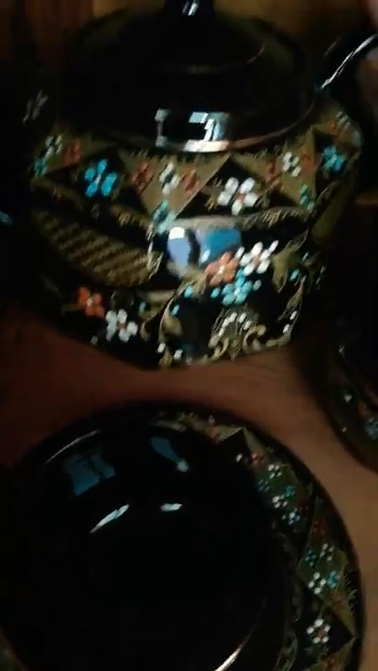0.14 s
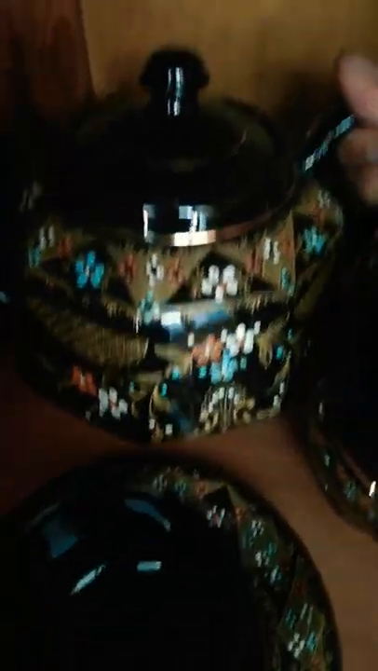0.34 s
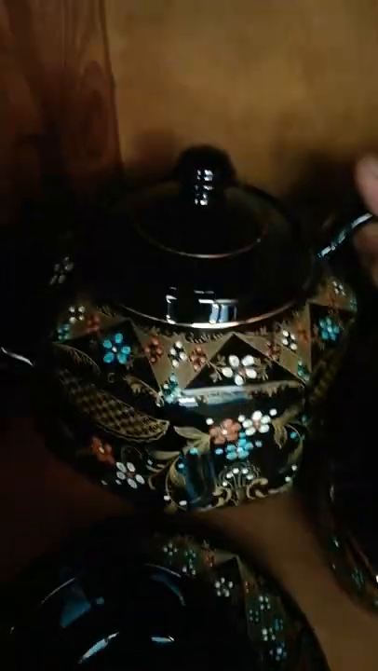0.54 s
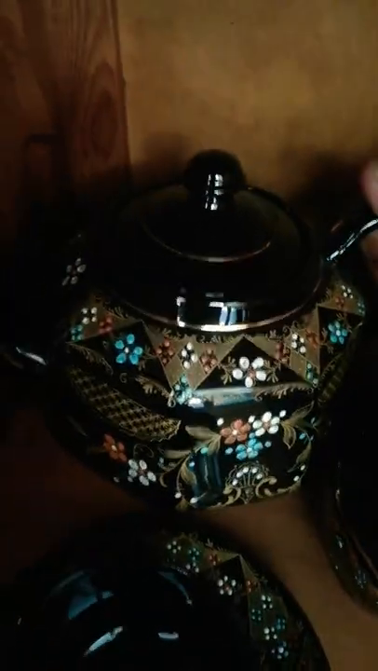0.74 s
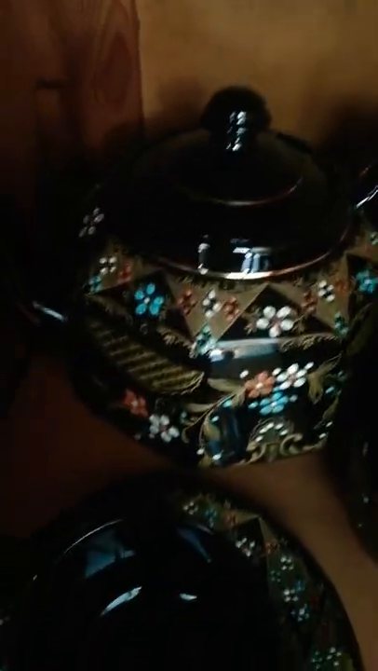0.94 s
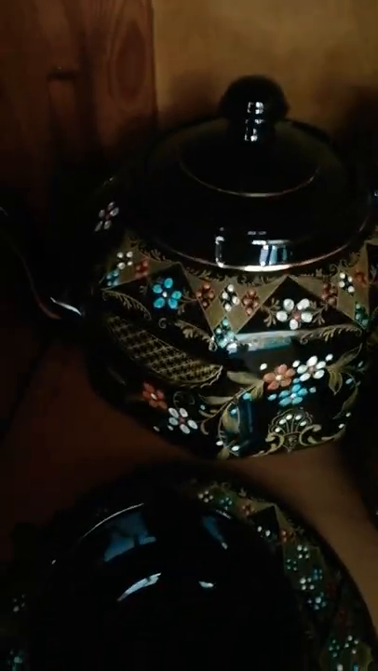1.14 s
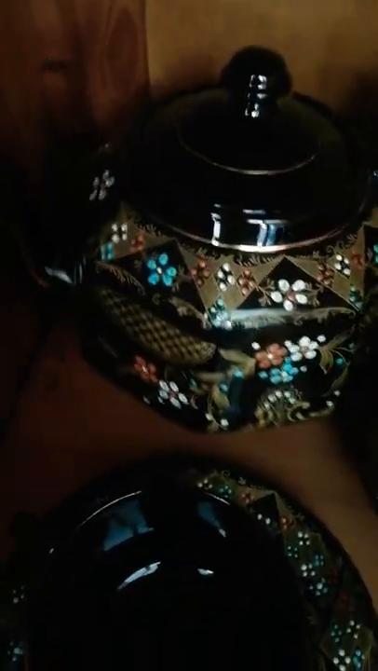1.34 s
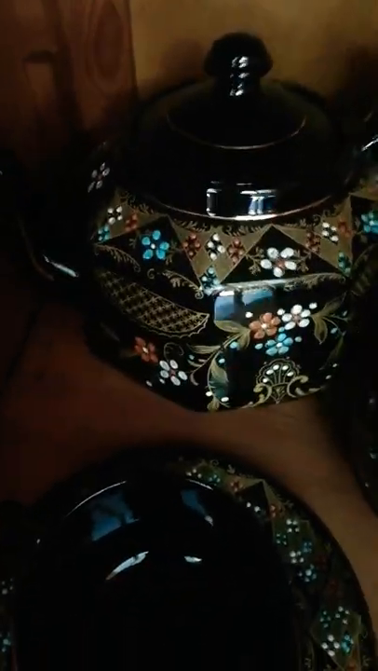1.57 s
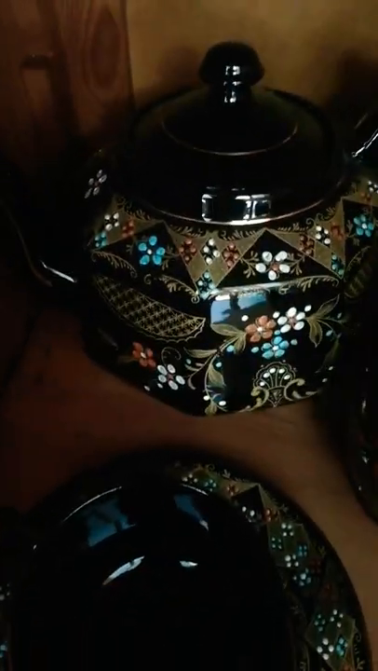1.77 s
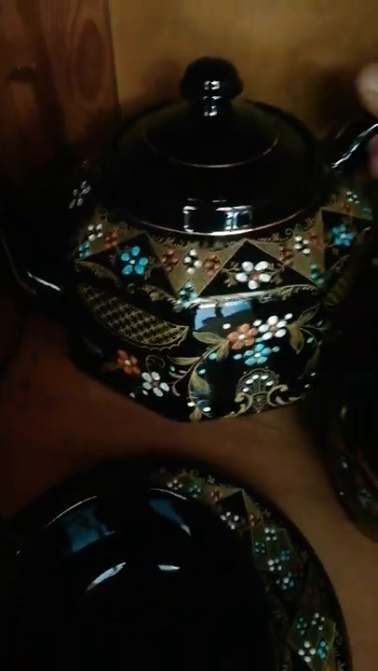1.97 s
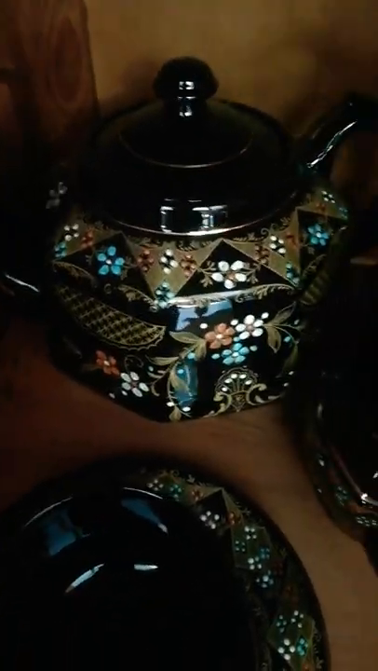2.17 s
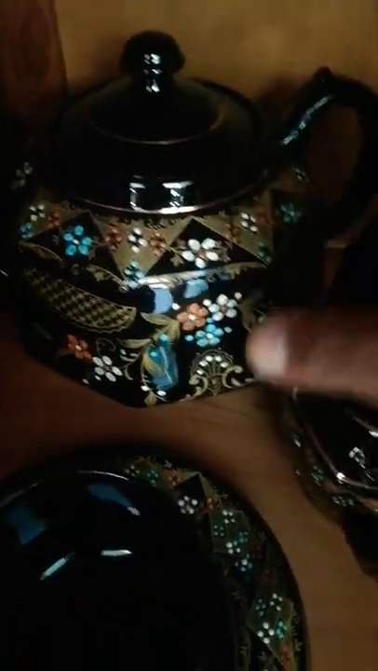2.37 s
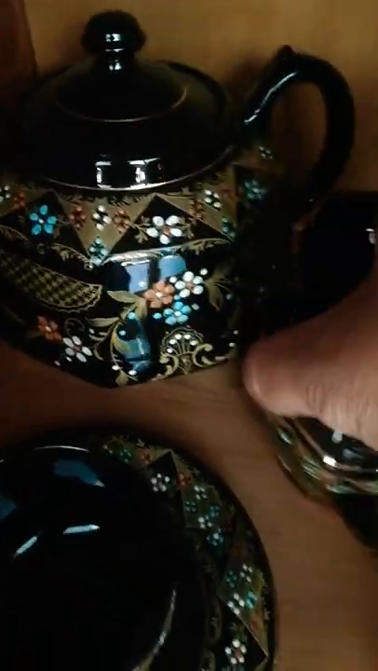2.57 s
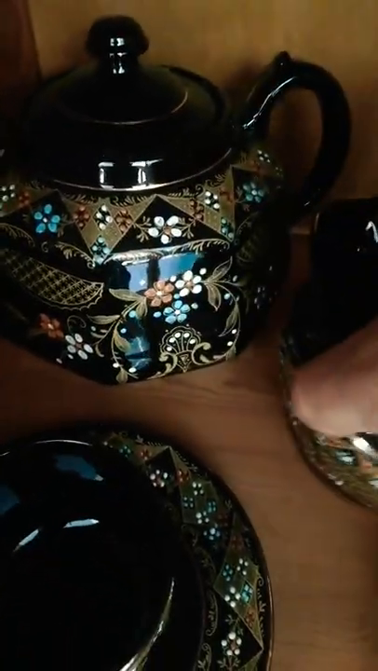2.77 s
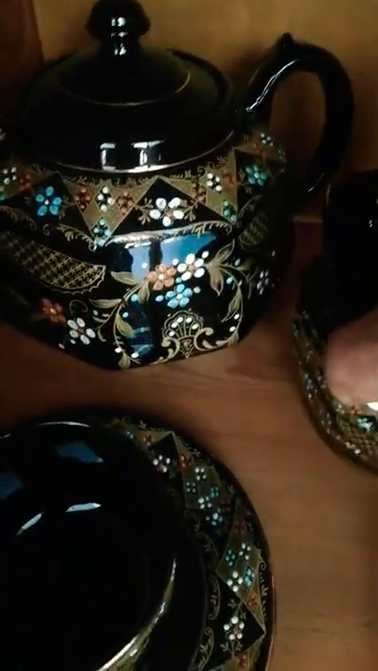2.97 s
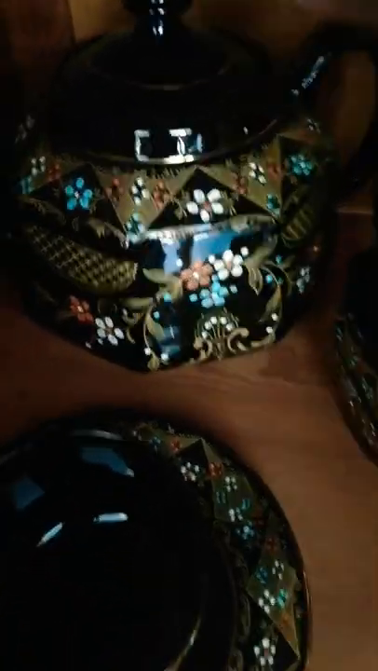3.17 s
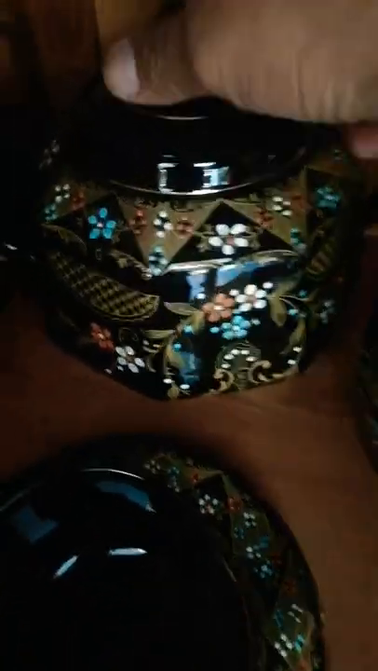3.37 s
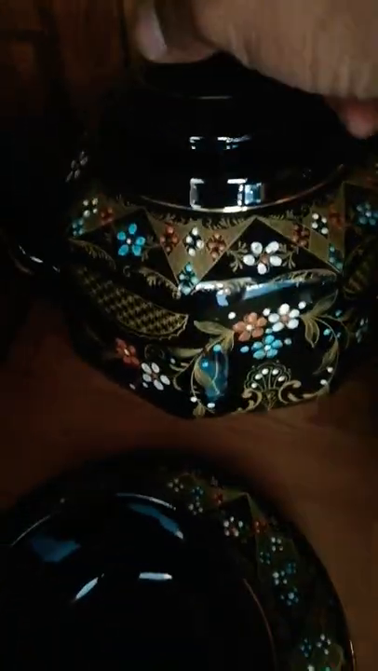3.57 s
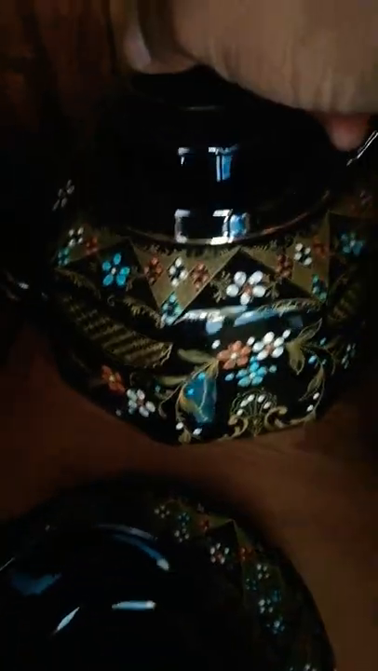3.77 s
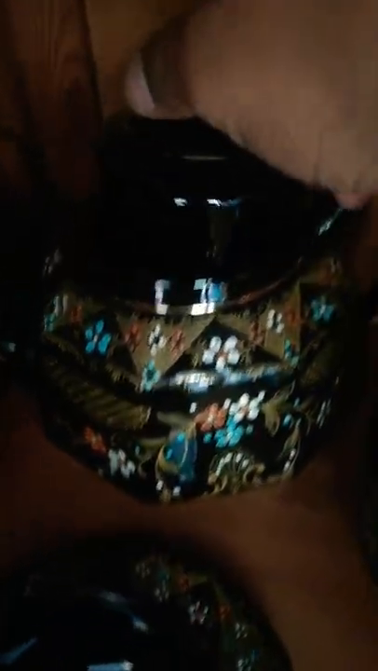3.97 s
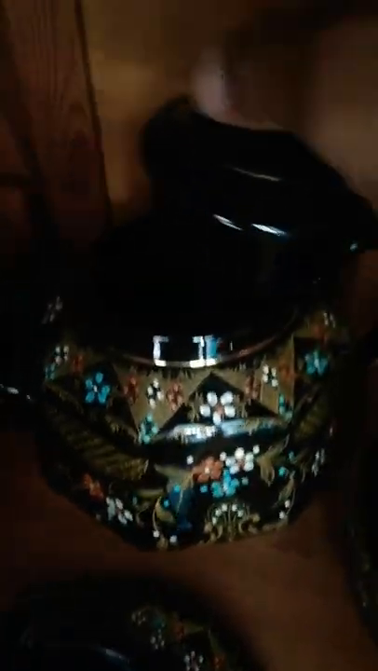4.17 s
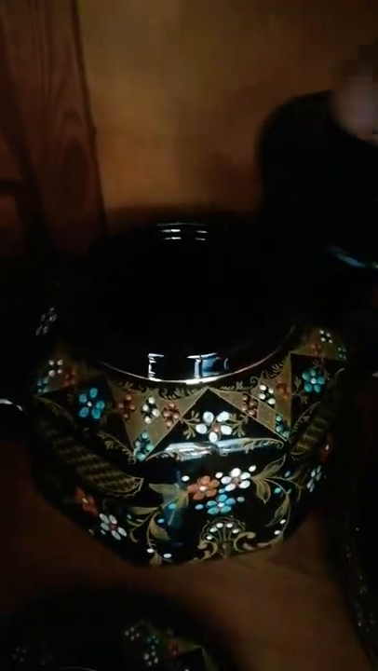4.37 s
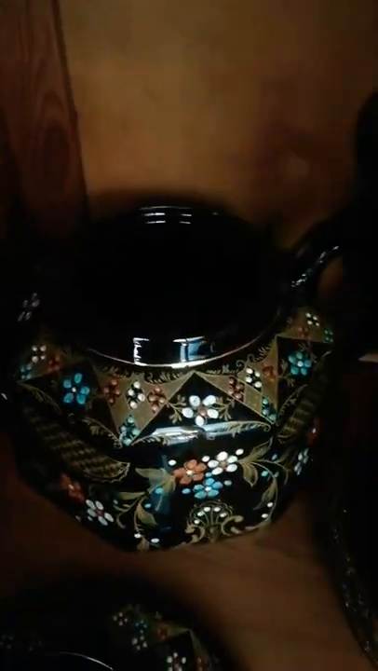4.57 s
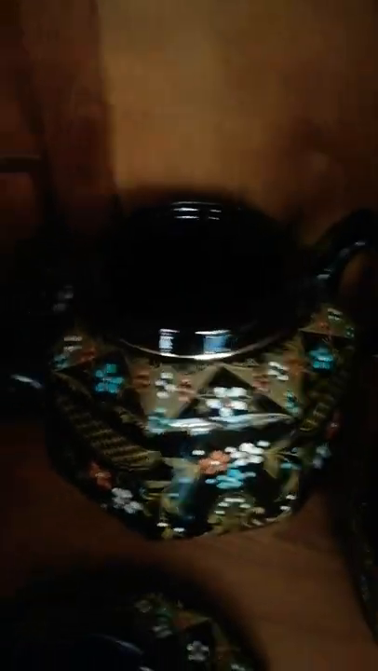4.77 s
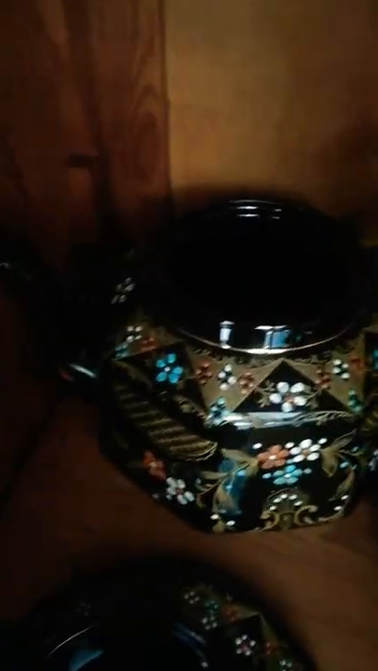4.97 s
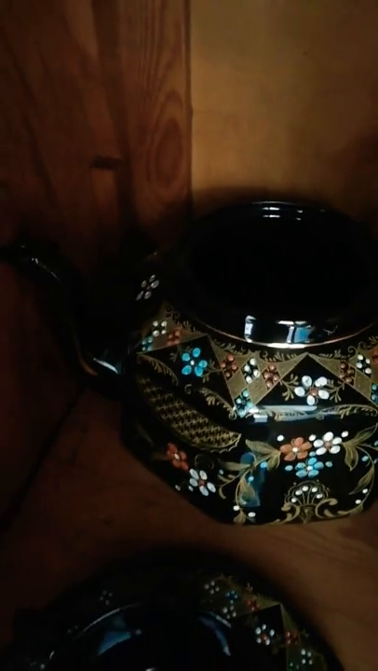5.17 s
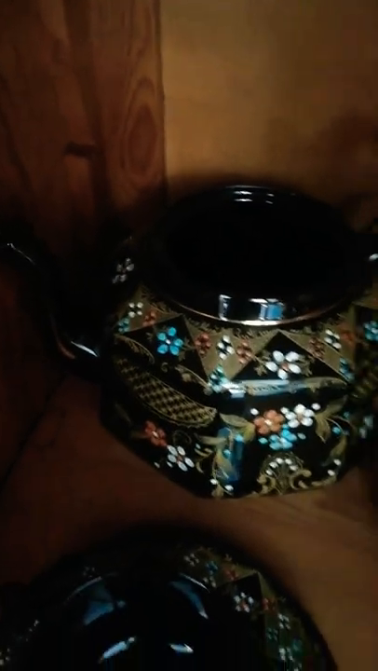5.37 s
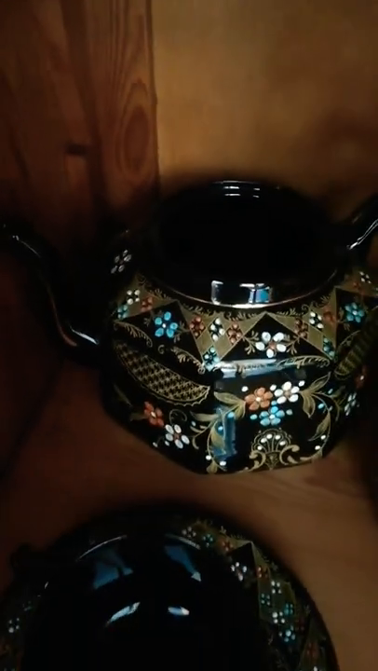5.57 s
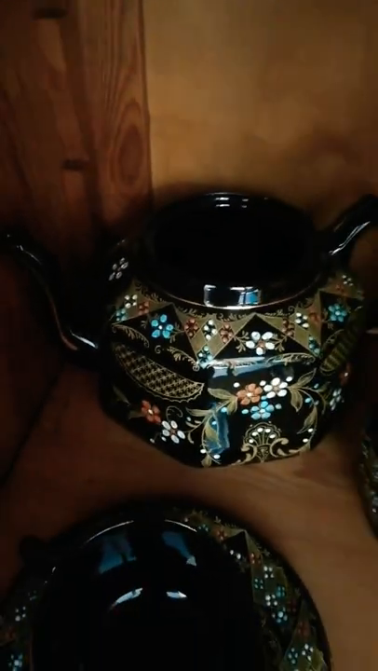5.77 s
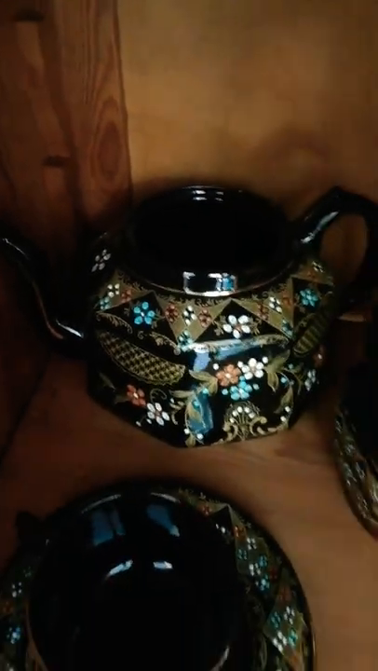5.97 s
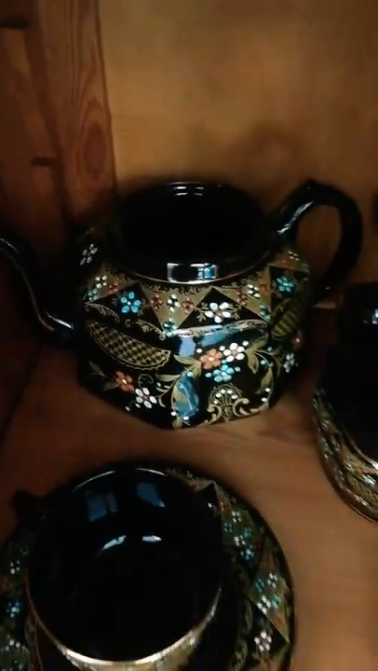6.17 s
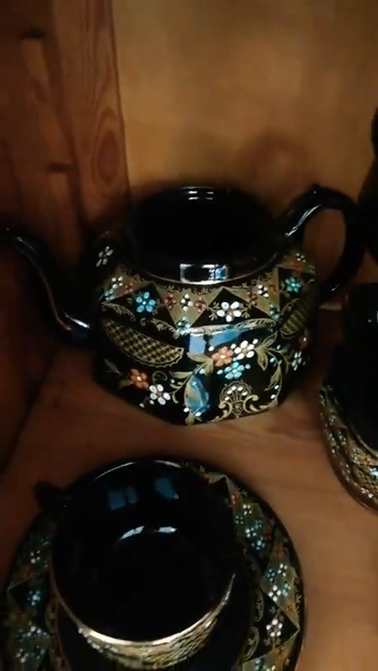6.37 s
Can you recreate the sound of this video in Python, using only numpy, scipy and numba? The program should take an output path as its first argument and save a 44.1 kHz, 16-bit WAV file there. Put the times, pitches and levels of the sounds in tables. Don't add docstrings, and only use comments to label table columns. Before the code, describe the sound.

China pieces are handled on a wooden shelf, heard from a hand-held phone very near. Low rumbles, dull knocks and gritty rasps lead to a hard teapot landing, by far the fullest hit. After a near pause, a jug is pushed aside with a clear clink; light finger taps follow, then a fast bright burst of lid clatter and a short ringing tail into faint hiss.

```python
import sys
import numpy as np
from scipy import signal
from scipy.fft import rfft, irfft, next_fast_len
from scipy.io import wavfile
from scipy.ndimage import uniform_filter1d, map_coordinates
from numba import njit

SR = 44100
rng = np.random.default_rng(int(sys.argv[2]) if len(sys.argv) > 2 else 0)


def bounce(signal):
    frames = np.transpose(np.atleast_2d(signal))
    limited = np.clip(frames, -1, 1)
    pcm = np.round(limited * 32767).astype(np.int16)
    wavfile.write(sys.argv[1], SR, pcm)


def invert_db(x):
    u = np.asarray(x, float) / 20
    return 10 ** u


N = 283563


def unit(x):
    return x / np.sqrt(np.mean(x ** 2))


def tint(x, points):
    hz, db = np.transpose(points)
    size = next_fast_len(x.shape[-1])
    log_hz = np.log(np.arange(size // 2 + 1) * SR / size + 1)
    gain = invert_db(np.interp(log_hz, np.log(hz), db))
    return irfft(rfft(x, size) * gain, size)[..., :x.shape[-1]]


def band(x, lo_hz, hi_hz):
    return signal.sosfilt(signal.butter(3, [lo_hz, hi_hz], "band", fs=SR, output="sos"), x)


def pair(apart_hz):
    mid, side = rng.standard_normal((2, N))
    side = tint(side, [(apart_hz / 10, -20), (apart_hz, 0)])
    return mid + side * np.array([[1], [-1]])


def drift(x, seconds):
    span = int(seconds * SR)
    slow = uniform_filter1d(uniform_filter1d(x, span), span)
    return unit(slow - slow.mean())


def grit(shape, scatter_db):
    return unit(rng.standard_normal(shape) * invert_db(scatter_db * rng.exponential(size=shape)))


@njit
def resonate(x, free, pole, left, right):
    out = np.zeros((2, len(x)))
    for m in range(len(pole)):
        z = 0j
        for i in range(len(x)):
            z = z * pole[m] * free[i] + x[i]
            out[0, i] += (left[m] * z).imag
            out[1, i] += (right[m] * z).imag
    return out


def ring(x, modes, lag_s=0.00047, touch=0.):
    hz, t60, db, pan_db = np.transpose(modes)
    pole = np.exp((2j * np.pi * hz - np.log(1000) / t60) / SR)
    start, turn = rng.uniform(0, 2 * np.pi, (2, len(hz)))
    turn = np.sin(turn) * np.minimum(2 * np.pi * hz * lag_s, np.pi)
    left = invert_db(db + pan_db / 2) * np.exp(1j * (start + turn))
    right = invert_db(db - pan_db / 2) * np.exp(1j * start)
    free = invert_db(-touch * np.ones(N) / SR)
    return resonate(x + 1e-18, free, pole, left, right)


def pushes(table):
    push = np.zeros(N)
    for s, db in table:
        push[int(s * SR)] = invert_db(db)
    return push


def strike(table, modes, touch=0.):
    return ring(pushes(table), modes, touch=touch)


def touching(table, db_per_s):
    t = np.arange(N) / SR
    contact = sum((t > row[0]) & (t < row[0] + row[-1]) for row in table)
    return db_per_s * np.clip(contact, 0, 1)


def heavy(table):
    s, ring_db, knock_db, thump_db, length = np.transpose(table)
    return np.c_[s, ring_db, knock_db, thump_db, thump_db - 14.5, length]


def light(table, passes):
    return np.array([(s, db, *passes, length) for s, db, length in table])


def blows(table, chatter_db, first_db, rise):
    drive, t = np.zeros((4, N)), np.arange(SR // 8) / SR
    for (s, *layer_db, length), bits in zip(table, grit((len(table), len(t)), 2.1)):
        part = t / length
        push = invert_db(chatter_db) * bits * np.minimum(part / rise, 1) / (1 + part ** 8)
        push[0] = invert_db(first_db)
        at = int(s * SR)
        drive[:, at:at + len(t)] += invert_db(np.array(layer_db))[:, None] * push
    return drive


# (frequency [Hz], level per Hz [dB])
CRACK = [(180, -28.5), (300, -8.5), (543, -4.5), (936, -6), (1810, -14), (2280, -18.5), (3120, -20.5),
         (6450, -21.5), (7000, -30.5), (8670, -22.5), (14600, -36.5), (15300, -60.5)]


def crack(x, t60):
    t = np.arange(SR // 5) / SR
    burst = unit(tint(rng.standard_normal((2, len(t))), CRACK)) * invert_db(-60 * t / t60)
    return signal.fftconvolve(x[None], burst, axes=1)[:, :N]


def china(table, modes, notes_db, crack_db, crack_t60, chatter_db, hard_hz, touch=0., first_db=0.95, rise=.02):
    drive = blows(table, chatter_db, first_db, rise)
    keep = np.exp(-2 * np.pi * hard_hz / SR)
    contact = signal.lfilter([1 - keep], [1, -keep], drive[0])
    notes = invert_db(notes_db) * ring(contact, modes, touch=touch)
    return notes + invert_db(crack_db) * crack(contact, crack_t60), drive[1:]


# (time [s], ring [dB], hollow knock [dB],
# board thump [dB], chatter length [s])
POT_BLOWS = [
    (1.047, -44, -33.5, -28.5, 0.014),
    (1.4686, -39.5, -46, -36, 0.04),
    (1.677, -4.5, -7.5, -5, 0.021),
    (1.7863, -23, -21.5, -25.5, 0.0061),
    (3.4387, -22.5, -30.5, -39.5, 0.018),
    (3.4665, -27.5, -41, -43, 0.017),
    (3.5011, -20.5, -33, -46.5, 0.0076),
             (1.6832, -4.5, -10, -13, .05),
]
# (frequency [Hz], t60 [s], level [dB], left minus right [dB])
POT = [(1530, 0.26, -13, 0), (1286, 0.068, -8.5, -1.5), (2486, 0.071, -11, -5.5),
       (2816, 0.046, -13.5, -0.5), (3220, 0.19, -26, -2.5), (3790, 0.093, -15.5, -1.5),
       (4530, 0.12, -12, -4), (5940, 0.05, -18, 1), (6486, 0.07, -20.5, 0), (9010, 0.08, -9.5, -4),
       (9330, 0.13, -15.5, -1), (10320, .1, -4.5, 0), (10512, 0.087, -10.5, -0.5), (12660, 0.042, -17, -7),
       (13000, .08, -17, 5)]


def teapot():
    return china(heavy(POT_BLOWS), POT, -13.5, -2.0, 0.023, -24.0, 8700, first_db=-5.5, rise=0.11)


# (time [s], ring [dB], chatter length [s])
LID_TILTS = [(3.5005, -24, 0.017), (3.6115, -11, .009), (3.6405, -13, .011), (3.689, -22.5, 0.00982),
             (3.7215, -24, 0.011)]
LID_LIFTS = [(3.8850, -2, 0.01), (3.8967, -9.5, .008), (3.9105, -2.5, 0.0059), (3.9233, -9, 0.012),
             (3.939, -5, .010), (3.9643, -14.5, 0.0022)]
CHOKE_S, CHOKE_DB_PER_S = 0.0015, 3498.5


def choke():
    closing = [(row[0] - CHOKE_S, CHOKE_S) for row in LID_TILTS[2:] + LID_LIFTS[1:]]
    return touching(closing, CHOKE_DB_PER_S)


# (time [s], length [s])
GRIP = [(4.25, 1)]


def held():
    return touching(LID_TILTS + LID_LIFTS, 270) + choke() + touching(GRIP, 70)


LID_HZ = [1555, 2016, 2730, 2690, 3200, 3370, 3537, 3712, 3736, 3920, 4243, 4269, 5480, 5722, 6016, 6490,
          6665, 7232, 7483, 8312, 8568, 8600, 9130, 9541, 9749, 10104, 10385, 11480, 12600, 14240]
# (t60 [s], level tilted [dB], level lifted [dB], left minus right [dB])
LID = [(0.18, -22.5, -21, -2.5), (1, -11.5, -24.5, -6), (0.49, -15.5, -19.5, 5), (0.3, -18, -27.5, -1),
       (0.31, -14, -24.5, 7), (0.38, -19.5, -16.5, -1), (0.2, -16.5, -28, 2), (0.41, -5, -11, 1.5),
       (0.36, -17, -19, 2), (0.25, -23.5, -19, 1), (0.15, -24.5, -20, 1), (0.29, -14, -18.5, 5),
       (.2, -23.5, -27.5, -3.5), (0.173, -23, -14.5, 4.5), (0.099, -18, -16.5, 3), (0.2, -10.5, -13, 6.5),
       (0.24, -11.5, -19.5, -2), (0.036, -12.5, -19.5, -2), (0.15, -13.5, -26.5, 0.5),
       (0.05, -9.5, -13.5, -3.5), (0.086, -17.5, -4, -5), (0.19, -18.5, -13.5, -3.5),
       (0.041, -15.5, -14.5, -5), (0.11, -22.5, -18, -5), (0.14, -14, -15, -3), (0.049, -15, -3.5, -6),
       (0.044, -15, -8, -1), (0.05, -15, -25, -6), (0.0067, -20, -20.5, -4), (.08, -19, -17, 0)]
# (hollow knock [dB], board thump [dB], deep thump [dB])
TILT_PASSES = (-32.5, -34, -41)


def tilted_lid():
    modes = np.c_[LID_HZ, LID][:, [0, 1, 2, 4]]
    return china(light(LID_TILTS, TILT_PASSES), modes, -6.0, -11.0, 0.012, -24.5, 16000, held(),
                 first_db=-1, rise=0.031)


# (hollow knock [dB], board thump [dB], deep thump [dB])
LIFT_PASSES = (-29, -29.5, -32.5)


def lifted_lid():
    modes = np.c_[LID_HZ, LID][:, [0, 1, 3, 4]]
    return china(light(LID_LIFTS, LIFT_PASSES), modes, -5.5, -22.5, 0.018, -25.0, 17000, held(),
                 first_db=-4, rise=0.046)


# (time [s], ring [dB], hollow knock [dB], board thump [dB], chatter length [s])
LID_RATTLES = [
    (0.0408, -59, -64, -35.5, 0.019),
    (0.3732, -16.5, -29.5, -31.5, 0.053),
    (1.1293, -54, -58, -47, 0.059),
]
# (frequency [Hz], t60 [s], level [dB], left minus right [dB])
SEATED = [(1221, 0.056, -2.5, 5.5), (990, 0.041, -3.5, 0.5), (2370, 0.03994, -17.5, -0.5),
          (2600, 0.38, -19, 4.5), (2770, 0.37, -19, 0.5), (3620, 0.047, -16, 0), (4830, 0.06, -14, 0.5),
          (7470, 0.034, -10, -3), (8420, 0.078, -16, -1.5), (9200, 0.09, -17, 1), (10250, 0.027, -9, -4),
          (12530, .03, -18.5, 0.5)]


def seated_lid():
    return china(heavy(LID_RATTLES), SEATED, -8, -13.0, 0.022, -32.0, 10700)


# (time [s], level [dB], chatter length [s])
RIM_TAPS = [(3.4385, -22.5, 0.011), (3.4660, -29.5, 0.017)]
# (frequency [Hz], t60 [s], level [dB], left minus right [dB])
RIM = [(4600, 0.054, -11.5, 2.5), (5000, 0.037, -16, 0.5), (7000, 0.08, -13.5, -1.5), (8500, 0.18, -3, -8),
       (8900, 0.0503, -7.5, -7), (9050, .04, -11, -4.5), (9200, .05, -7.5, -5.5),
       (10600, 0.056, -7.5, -4.5), (10340, 0.042, -9.5, -6), (11592, 0.029, -17.5, -3.5),
       (11900, .05, -17, -4), (13300, 0.042, -17.5, -3.5), (14600, .05, -19, -3), (15000, .04, -26.5, -1.5)]
# (time [s], level [dB], length [s])
KNOB_SHIFTS = [(.925, -63.5, 0.076), (1.125, -48.5, 0.033), (1.158, -49.5, 0.027), (1.468, -43.5, 0.021)]
# (frequency [Hz], t60 [s], level [dB], left minus right [dB])
KNOB = [(2310, 0.074, -4.5, -1.5), (2720, .08, -19, 8), (3150, 0.089, -3, -3), (3450, 0.089, 2, -10)]


def rattle():
    taps = light(RIM_TAPS + LID_TILTS + LID_LIFTS, (0, 0, 0))
    creep = light(KNOB_SHIFTS, (0, 0, 0))
    rim, _ = china(taps, RIM, -11.0, -23, 0.013, -25.5, 15000, choke(), first_db=-12, rise=0.53)
    knob, _ = china(creep, KNOB, -6.5, -28, .02, -25.5, 6000, first_db=-24, rise=0.22)
    return rim + knob


# (time [s], ring [dB], hollow knock [dB], board thump [dB], chatter length [s])
JUG_BLOWS = [
    (0.1025, -22, -22, -29.5, 0.005),
    (2.8559, -14.5, -20.5, -28, 0.0078),
]
# (frequency [Hz], t60 [s], level [dB], left minus right [dB])
NUDGED = [(1034, 0.17, -21, 4.5), (1390, 0.19, -15, 10), (2250, 0.033, -14, 2), (2679, .04, -6, -6),
          (3500, 0.032, -13, 4), (4450, 0.03, 0, -3), (5550, 0.018, -6.5, 3), (6417, .04, -2, 7.5),
          (7849, 0.028, -6, 3), (9350, 0.052, -6.5, -8), (9880, 0.036, -11.5, -4.5),
          (11170, 0.023, -35, -4.5), (12000, 0.017, -7.5, -6)]


def nudged_jug():
    return china(heavy(JUG_BLOWS)[:1], NUDGED, -9.0, -9.5, 0.078, -21, 7500, first_db=-7, rise=0.3)


# (frequency [Hz], t60 [s], level [dB], left minus right [dB])
JUG = [(1370, 0.13, -9, 0.5), (1080, 0.039, -13, -36), (2720, 0.047, -10.5, -5), (2798, 0.36, -27.5, -7),
       (3572, 0.19, -20, -3), (4610, 0.045, -6.5, 4.5), (5530, 0.043, -11, -2), (6240, 0.0302, -5, 7),
       (7150, 0.0554, -10, 0), (9500, 0.025, -8.5, -2), (9780, 0.047, -6.5, -3.5),
       (10100, 0.034, -15, -6.5), (12000, 0.0686, -14, -1)]


def free_jug():
    return china(heavy(JUG_BLOWS)[1:], JUG, -6.5, -4.0, 0.016, -25.0, 8700)


# (time [s], level [dB])
JUG_CLINK = [(2.857, -30.5)]
# (t60 [s], level [dB], left minus right [dB])
JUG_HZ = [1421, 1540, 3252, 4430]
JUG_NOTES = [(0.46, -3, 1.5), (0.45, -14.5, 2), (0.31, -10, -2), (.1, 0, 0.16)]


def jug_clink():
    return ring(pushes(JUG_CLINK), np.c_[JUG_HZ, JUG_NOTES], .00003)


# (time [s], tap [dB], hollow knock [dB], board thump [dB])
DULL_BLOWS = [(0.231, -38, -49, -37.5), (0.3038, -41, -43, -41), (0.506, -33.5, -58, -37),
              (0.59, -41, -37.5, -35), (1.3396, -32, -45, -47), (1.529, -47.5, -35.5, -34),
              (2.044, -60, -63.5, -25), (2.574, -61, -50, -61), (2.6109, -40, -46, -57),
              (2.645, -57, -27.5, -36), (2.6635, -45, -36.5, -36)]


def dull_bumps():
    rows = heavy([(*row, 0.01) for row in DULL_BLOWS])
    return china(rows, [(2950, 0.017, -40.0, 0.0074)], -8.5, -12.0, 0.038, -22.5, 3000)


def move(row, edge_db, curve):
    start, peak, end = row[:3]
    t = np.arange(N) / SR
    away = np.where(t < peak, (peak - t) / (peak - start), (t - peak) / (end - peak))
    return invert_db(-edge_db * np.minimum(away, 4) ** curve)


SLIDE_EDGE_DB, SLIDE_CURVE = 21, 2.3
# (start [s], fastest [s], end
# [s], rasp [dB], hollow scrape [dB])
POT_SLIDES = [(.025, .04, 0.11, -55.5, -58), (.14, .28, 0.42, -56.5, -57.5), (.21, .25, .4, -61.5, -63),
              (.33, .4, 0.52, -57.5, -53), (.46, .55, 0.69, -68, -55), (.68, .82, 0.96, -56.5, -45.5),
              (1.02, 1.058, 1.105, -60.5, -47.5), (1.11, 1.142, 1.18, -61.5, -64),
              (1.25, 1.4, 1.55, -53, -45.5), (1.56, 1.67, 1.72, -43.5, -42), (1.81, 1.9, 2.09, -69, -56),
              (3.615, 3.66, 3.76, -44, -46.5)]
HAND_SLIDES = [(2.045, 2.075, 2.14, -56.5, -62), (2.12, 2.15, 2.19, -62.5, -71.5),
               (2.15, 2.3, 2.58, -71.5, -76.5)]
JUG_SLIDES = [(2.545, 2.58, 2.63, -60, -49.5), (2.76, 2.8, 2.85, -64, -48), (2.6, 2.665, 2.7, -45, -38),
              (2.68, 2.738, 2.785, -48, -38), (2.815, 2.86, 2.92, -51, -42), (2.9, 2.955, 3.0, -49, -39)]
SKID = [
    (1.668, 1.675, 1.82, -29, -10.5),
]
# (start [s], hardest [s], end [s], rumble [dB])
LEANS = [(-.05, 0, 0.17, -52), (0, 0.213, 0.58, -42.5), (0.41, 0.436, 0.47, -38.5),
         (0.495, 0.527, 0.59, -43), (0.597, 0.832, 1.04, -43.5), (0.95, 1.4, 2.15, -50),
         (1.484, 1.54, 1.69, -32.5), (1.8, 1.853, 2.08, -61.5), (2.047, 2.057, 2.26, -42.5),
         (2.55, 2.707, 2.96, -47.5), (2.893, 2.971, 3.11, -45), (3.88, 3.978, 4.3, -54)]


def moves():
    levels = np.zeros((4, N))
    for table, hiss_db in (POT_SLIDES, -1), (HAND_SLIDES, 7.5), (JUG_SLIDES, -5.5):
        for row in table:
            rasp_db, scrape_db = row[3:]
            gains = invert_db(np.array([[scrape_db], [rasp_db], [rasp_db + hiss_db]]))
            levels[1:] += gains * move(row, SLIDE_EDGE_DB, SLIDE_CURVE)
    for row in LEANS:
        levels[0] += invert_db(row[3]) * move(row, SLIDE_EDGE_DB, SLIDE_CURVE)
    for row in SKID:
        rasp_db, scrape_db = row[3:]
        gains = invert_db(np.array([[rasp_db + 12], [scrape_db], [rasp_db], [rasp_db - 14]]))
        levels += gains * move(row, 48.5, 1.1)
    return levels


# (frequency [Hz], level per Hz [dB])
RASP = [(710, -27.5), (1200, 2), (1340, -11.5), (1470, 3), (1580, -5), (2330, -6.5), (2650, -11.5),
        (2850, -6), (4190, -11.5), (6710, -11.5), (9250, -18), (10300, -7.5), (15400, -29.5)]
# (frequency [Hz], t60 [s], level [dB], left minus right [dB])
HOLLOW = [(434.6, 0.26, -15, -0.5), (462.8, 0.4, -12, -7), (587, 0.072, -11.5, -5), (693, 0.067, -4, -3),
          (761, 0.063, -2.5, -6), (815, 0.093, -8.5, -3), (894, .12, -8, 6), (970, 0.07, -16.5, -1),
          (1224, 0.04, -8.5, 1.5), (1400, 0.028, -8, 3.5)]
BOARD_HZ = [208, 260, 295]
DEEP_HZ = [90, 111, 134, 165]
# (t60 [s], level [dB], left minus right [dB])
BOARD = [(0.33, -13.5, -3), (0.11, -3.5, -4), (0.22, -15, -4)]
DEEP = [(0.047, -15.5, -1), (0.2, -10.5, -2), (0.21, -9.5, -1.6), (0.14, -14.5, -2)]


def drag():
    rumble, scrape, rasp, fine = moves()
    slips = uniform_filter1d(grit(N, 1.9) ** 2, size=90) ** 0.24
    noise = tint(pair(1700) * slips, RASP)
    wake = unit(ring(grit(N, 1.9), np.vstack([POT[2:], SEATED[1:]])))
    low = unit(band(noise, 1200, 5500)) + invert_db(-3.5) * band(wake, 1100, 7500)
    high = unit(band(noise, 7300, 18000)) + invert_db(-5.5) * band(wake, 6000, 15500)
    shelf = np.c_[DEEP_HZ + BOARD_HZ, DEEP + [(.2, -9, -2)] + BOARD[1:]] * [1.0, 0.24, 0.79, 1.0]
    wood = rumble * unit(band(ring(grit(N, 1.6), shelf, .0001), 92, 230))
    cavity = np.array(HOLLOW) * [1, 0.55, 0.85, 0.98]
    hollow = scrape * unit(band(ring(grit(N, 2.4), cavity, 0.00052), 350, 1300))
    patchy = invert_db(2.0 * drift(slips, 0.026))
    return wood + hollow + (rasp * low + fine * high) * patchy


# (start [s], fastest [s], end [s], level [dB])
STROKE = (2.13, 2.28, 2.56, -65)
# (frequency [Hz], t60 [s], level [dB], left minus right [dB])
STROKE_NOTES = [(11330, 0.0118, -2.5, -8.5), (10770, 0.016, -8, -8), (4590, 0.0126, -8, 0.5),
                (1167, 0.0492, -19.5, 11.5)]


def stroke():
    hiss = unit(ring(rng.standard_normal(N), STROKE_NOTES))
    return hiss * invert_db(STROKE[3]) * move(STROKE, SLIDE_EDGE_DB, SLIDE_CURVE)


# (time [s], level [dB])
TICKS = [(.5207, -37.5), (1.971, -43.5), (2.289, -40), (3.857, -40.5), (3.870, -40)]


def ticks():
    t = np.arange(SR // 50) / SR
    snap = band(rng.standard_normal((2, len(t))) * invert_db(-60 * t / 0.008), 451, 9496)
    return signal.fftconvolve(pushes(TICKS)[None], snap, axes=1)[:, :N]


def damped(modes):
    modes = np.array(modes)
    return np.c_[modes[:, 0], np.minimum(modes[:, 1], .28), modes[:, 2:]]


# (time [s], length [s])
SETTLE = [(1.742, 0.026), (1.742, 0.277)]
# (time [s], level [dB])
HEAVES = [(.041, -26.5), (.056, -34.5), (1.2315, -35), (1.4686, -22.5), (1.529, -19.5), (1.7863, -34),
          (3.415, -47.5)]
# (time [s], level [dB])
GULPS = [(.102, -19.5), (2.646, -30), (3.439, -21.5), (3.501, -28)]
# (frequency [Hz], t60 [s], level [dB], left minus right [dB])
POT_AIR = [(759.8, 0.07, 0.5, -4.5), (777, 0.055, -14, -10.5)]
# (time [s], level [dB])
BOOM = [(1.675, -8.5)]
# (frequency [Hz], t60 [s], level [dB], left minus right [dB])
BOOM_NOTE = [(258.3, 0.9, 0.0013, -4.5)]
# (time [s], level [dB])
SHAKES = [(1.529, -28), (1.675, -38), (2.044, -30.5), (3.612, -48), (3.886, -49.5)]
# (frequency [Hz], t60 [s], level [dB], left minus right [dB])
SWAY = [(43.5, 0.51, 0, -2), (76, 0.3, -2, -5)]


def woodwork(knock, thump, deep):
    settled = touching(SETTLE[:1], 650) + touching(SETTLE[1:], 100)
    upper = invert_db(-1.0) * ring(thump, damped(np.c_[BOARD_HZ, BOARD]), .0001, settled)
    lower = invert_db(4.0) * ring(deep + pushes(HEAVES), np.c_[DEEP_HZ, DEEP], .0001)
    hollow = invert_db(-5.5) * ring(knock, HOLLOW, 0.000062, settled) + strike(GULPS, POT_AIR)
    boom = strike(BOOM, BOOM_NOTE, 2.1 * settled)
    low = upper + lower + boom + strike(SHAKES, SWAY)
    return band(low, 44, 840) + band(hollow, 110, 4200)


# (time [s], level [dB])
CUP_JOLT = [(1.69, -38.5)]
# (t60 [s], level [dB], left minus right [dB])
CUP_NOTE = [(1.2, 0, 0.0018)]
# (time [s], length [s])
CUP_STILLED = [(2.29, 1)]


def cup():
    return strike(CUP_JOLT, np.c_[[1631], CUP_NOTE], touching(CUP_STILLED, 150))


# (frequency [Hz], t60 [s], likeness of the ports [0-1])
ALCOVE = [(202, 0.32, 0.95), (770, 0.21, 0.9), (3149, 0.25, 0.7), (12700, 0.13, .05)]


def alcove(x):
    t, tail = np.arange(SR // 2) / SR, 0
    for hz, t60, alike in ALCOVE:
        noise = band(rng.standard_normal((2, len(t))), hz / 2, min(hz * 2, SR / 2 - 2000))
        left, other = noise * invert_db(-60 * t / t60)
        right = alike * left + np.sqrt(1 - alike ** 2) * other
        tail = tail + np.array([left, right]) / np.sqrt(t60 * SR / 14)
    onset = np.minimum(t / 0.012, 1)
    return invert_db(-11) * signal.fftconvolve(x, tail * onset, axes=1)[:, :N]


def sway(x):
    lag = 1.7 * drift(rng.standard_normal(N), .06)
    return np.array([x[0], map_coordinates(x[1], [np.arange(N) - lag], mode="mirror")])


# (frequency [Hz], left minus right [dB])
SHADOW = [(2500, 0.5), (5000, 4), (8000, -4.5), (12000, -12.5)]


def shade(x):
    points = np.array(SHADOW)
    return np.array([tint(x[0], points * [1, .5]), tint(x[1], points * [1, -.5])])


# (frequency [Hz], level per Hz [dB])
ROOM = [(12, -29), (20, -4), (59, -3), (76, -7.5), (106, -6), (185, -13), (266, -18.5), (490, -19.5),
        (880, -27), (1300, -27.5), (6520, -32), (10200, -29), (15400, -34.5)]


def room():
    air = unit(tint(pair(400), ROOM))
    wander = unit(uniform_filter1d(uniform_filter1d(rng.standard_normal(N), size=3000), size=3000))
    air = air + band(air, 72, 330) * (invert_db(2.0 * wander) - 1)
    return air * invert_db(-66.5 + np.array([[1.5], [-1.5]]))


# (time [s], level [dB])
KNOCKS = [(.394, -35), (.612, -37), (.624, -50.5), (1.341, -38), (2.612, -39.5), (4.397, -65), (5.865, -67)]


def scene():
    pieces = [teapot(), seated_lid(), dull_bumps(), nudged_jug(), free_jug(), tilted_lid(), lifted_lid()]
    knock, thump, deep = sum(drives for _, drives in pieces)
    near = sum(sound for sound, _ in pieces) + woodwork(knock + pushes(KNOCKS), thump, deep) + drag()
    near = near + alcove(near) + ticks()
    still = room() + cup()
    near = near + rattle() + jug_clink() + stroke()
    return shade(sway(near)) + still


def low_pass(x):
    return signal.sosfilt(signal.butter(12, 15600, fs=SR, output="sos"), x)


def record(dry):
    rounded = np.tanh(1.098 * dry) / 1.033
    mix = signal.sosfilt(signal.ellip(8, .2, 70, 15600, fs=SR, output="sos"), rounded)
    return low_pass(mix)


dry = scene()
out = record(dry)
bounce(out)
```